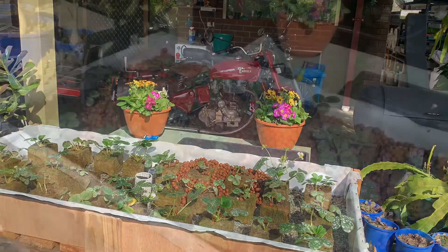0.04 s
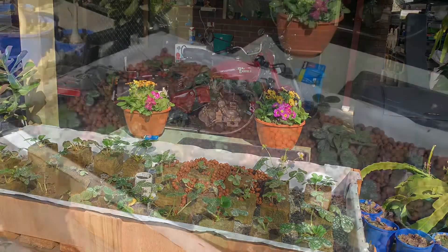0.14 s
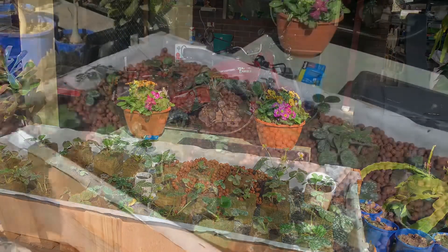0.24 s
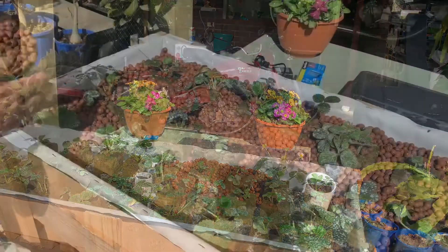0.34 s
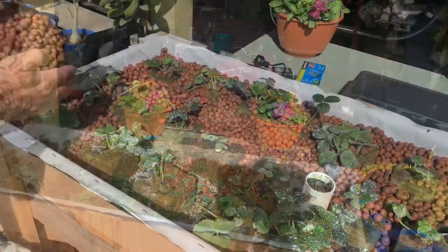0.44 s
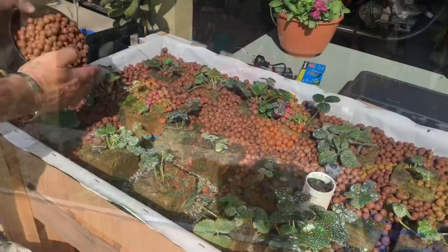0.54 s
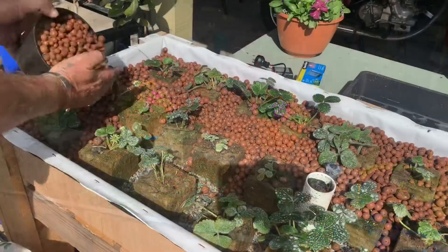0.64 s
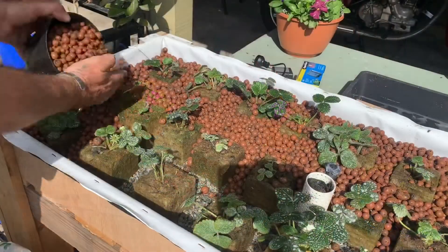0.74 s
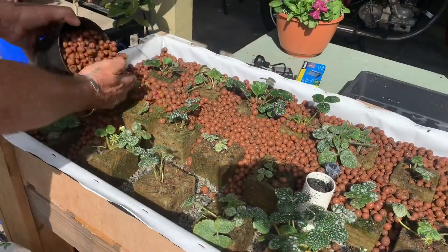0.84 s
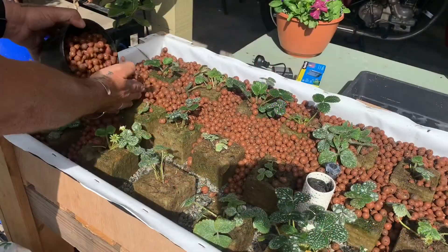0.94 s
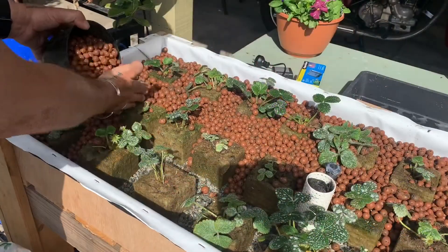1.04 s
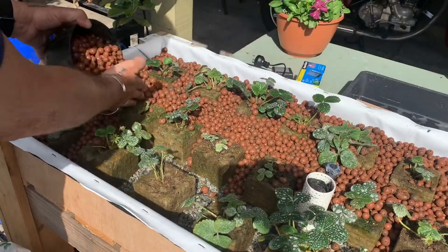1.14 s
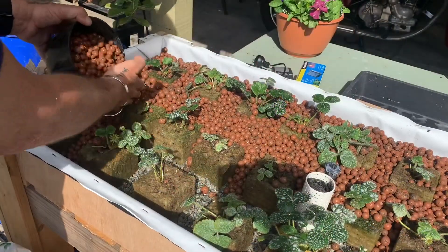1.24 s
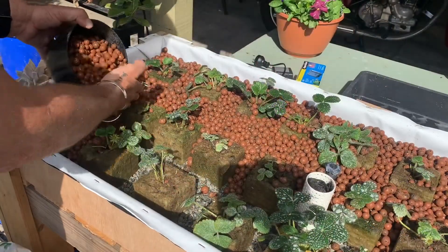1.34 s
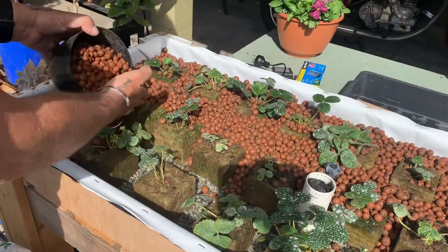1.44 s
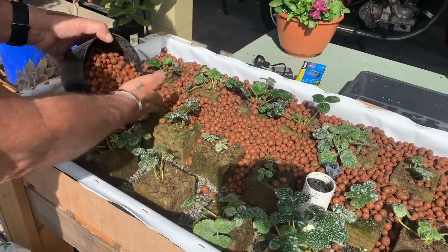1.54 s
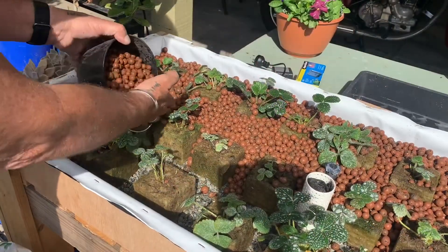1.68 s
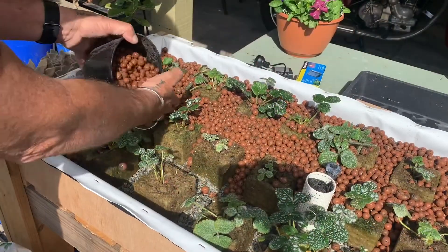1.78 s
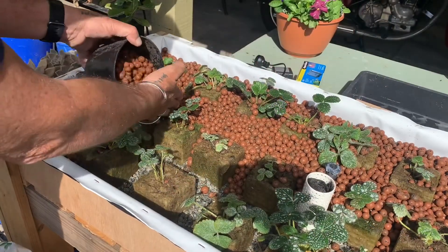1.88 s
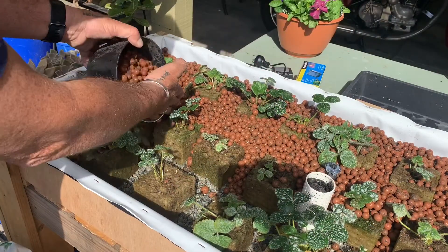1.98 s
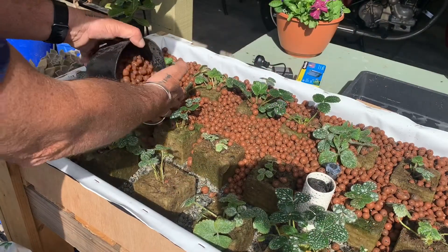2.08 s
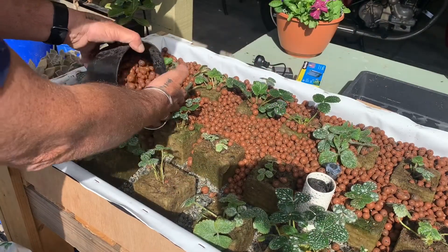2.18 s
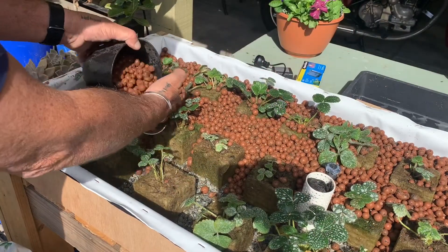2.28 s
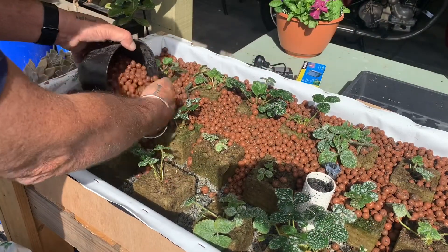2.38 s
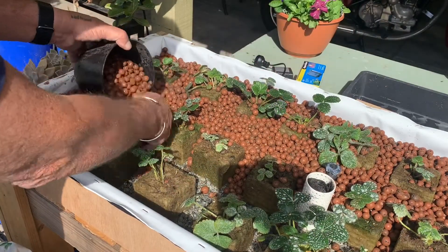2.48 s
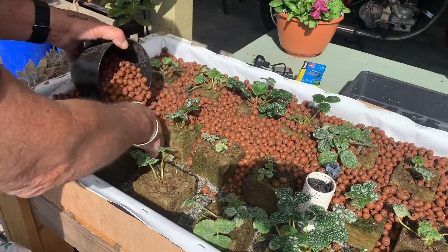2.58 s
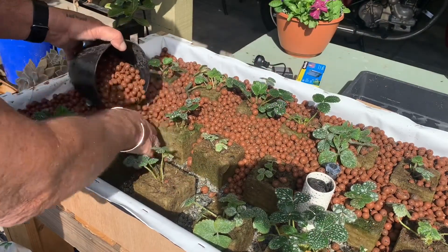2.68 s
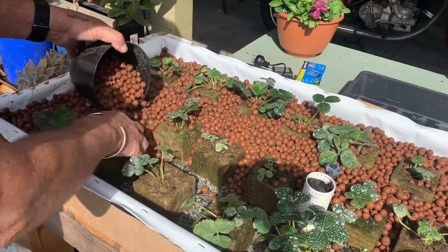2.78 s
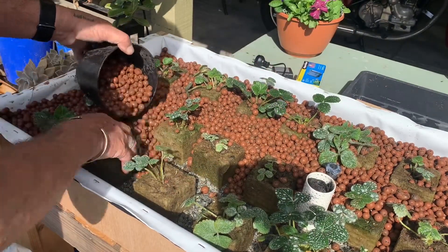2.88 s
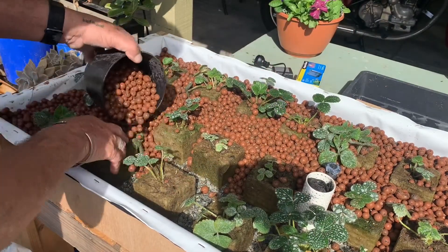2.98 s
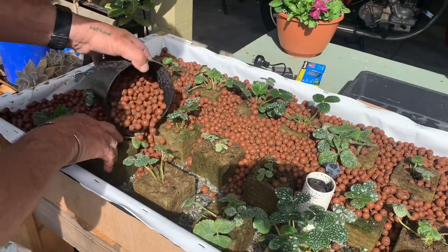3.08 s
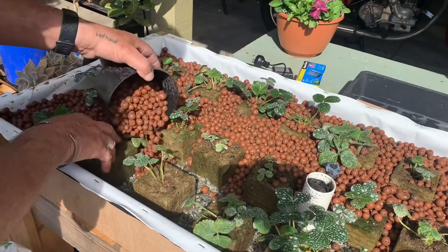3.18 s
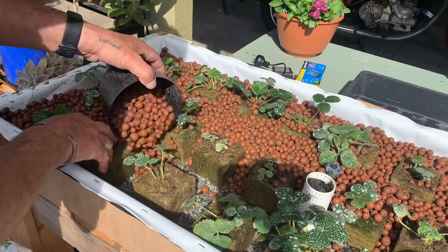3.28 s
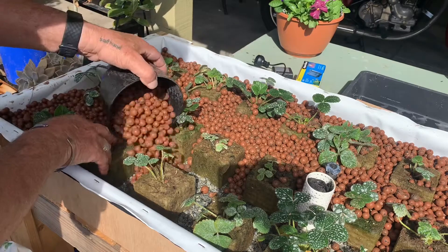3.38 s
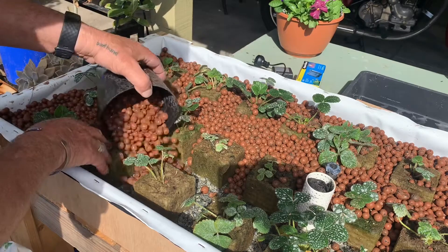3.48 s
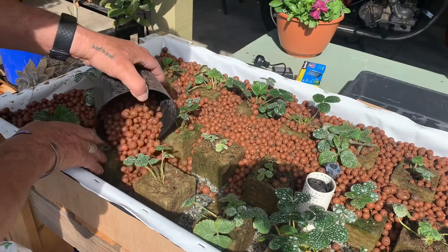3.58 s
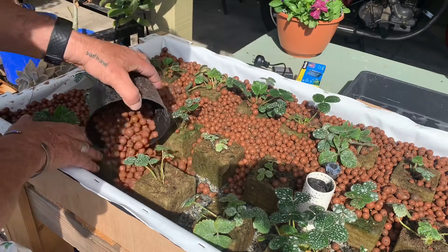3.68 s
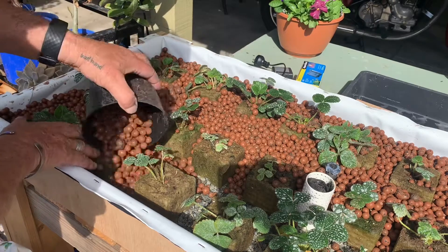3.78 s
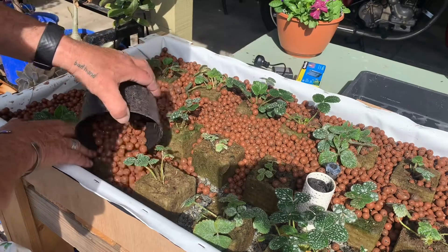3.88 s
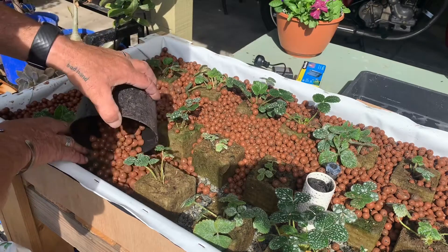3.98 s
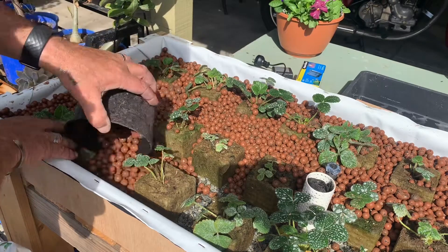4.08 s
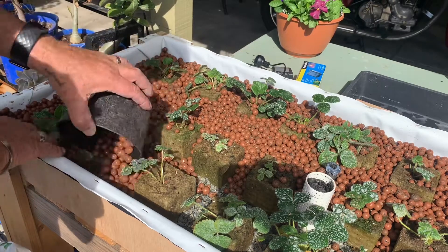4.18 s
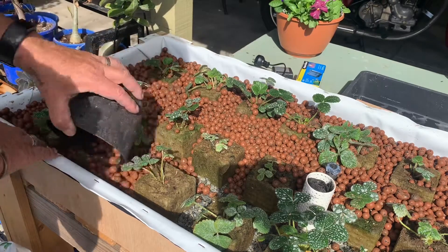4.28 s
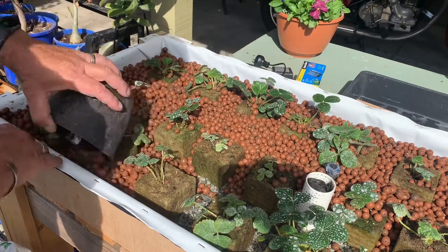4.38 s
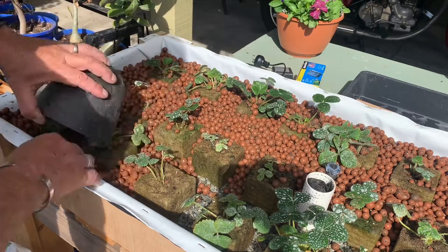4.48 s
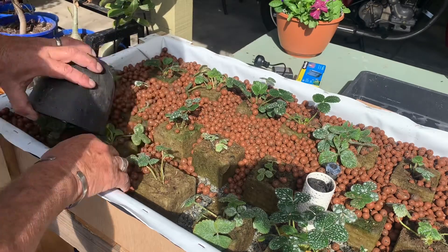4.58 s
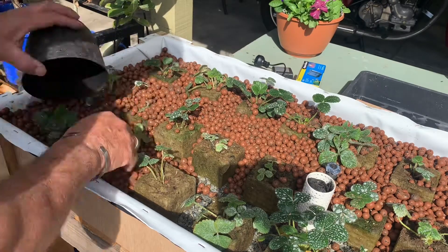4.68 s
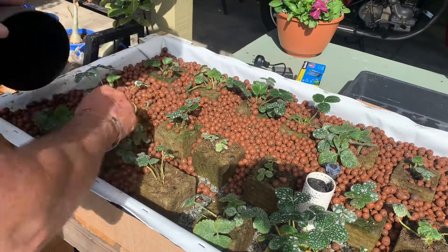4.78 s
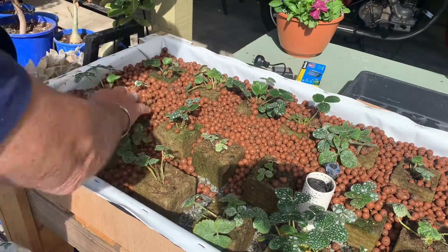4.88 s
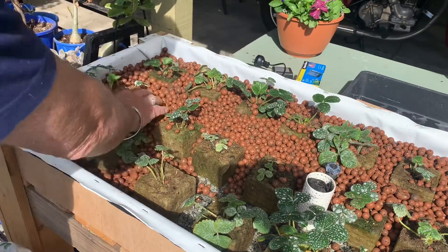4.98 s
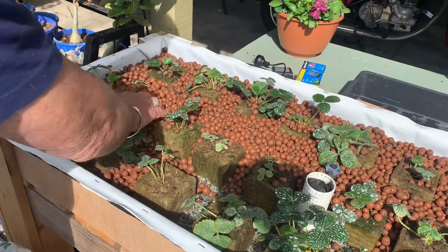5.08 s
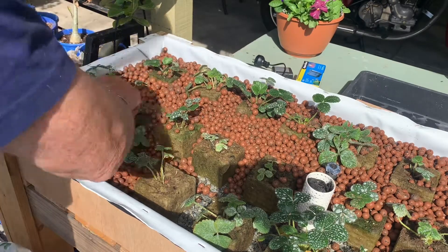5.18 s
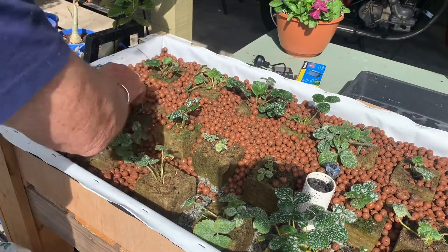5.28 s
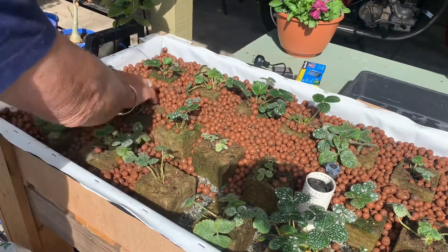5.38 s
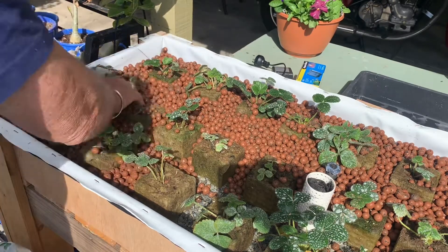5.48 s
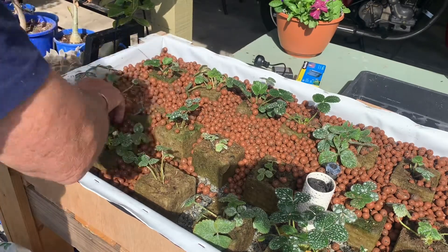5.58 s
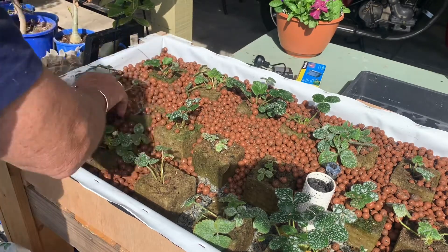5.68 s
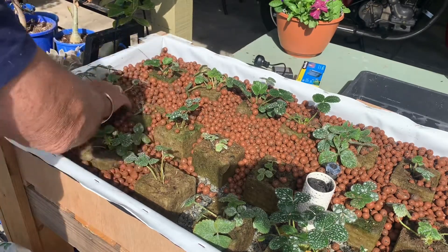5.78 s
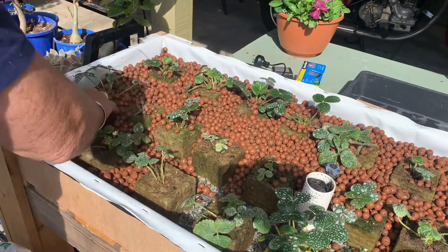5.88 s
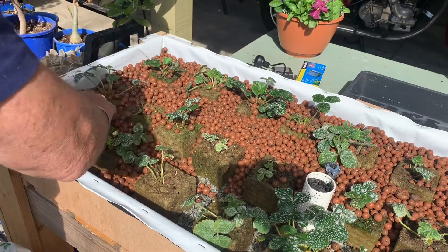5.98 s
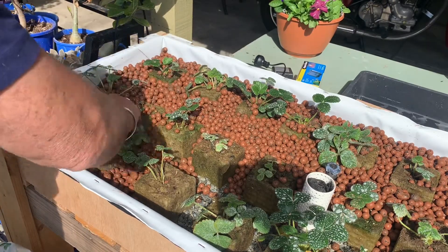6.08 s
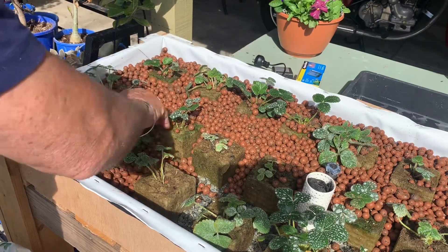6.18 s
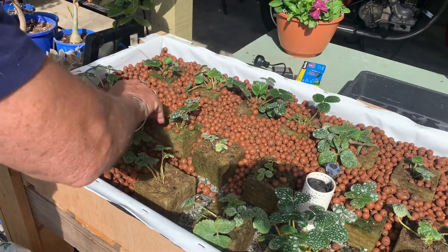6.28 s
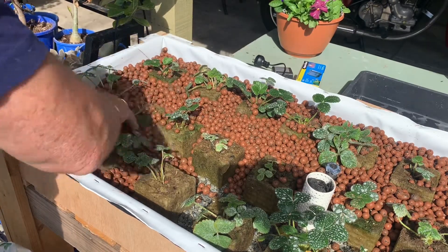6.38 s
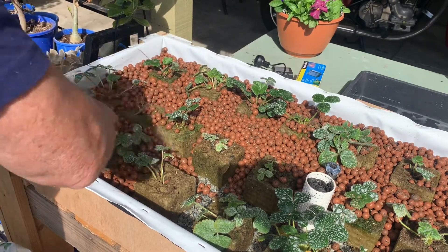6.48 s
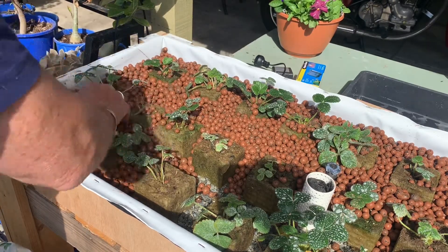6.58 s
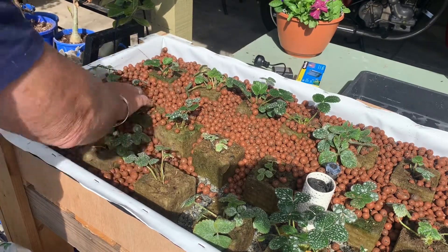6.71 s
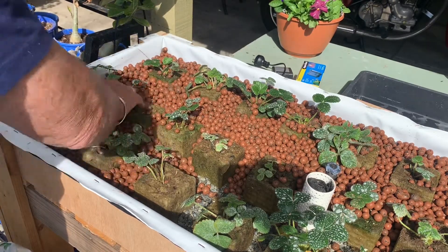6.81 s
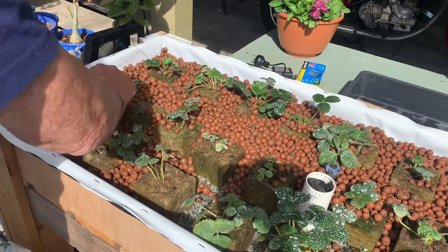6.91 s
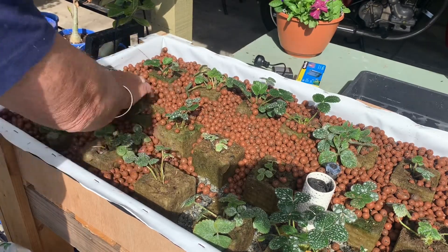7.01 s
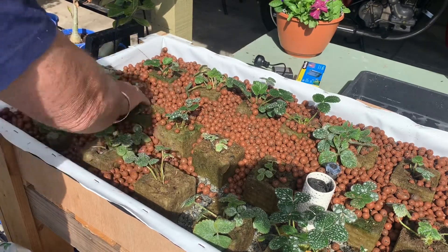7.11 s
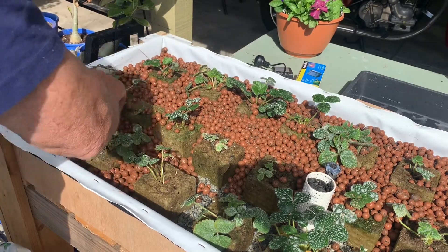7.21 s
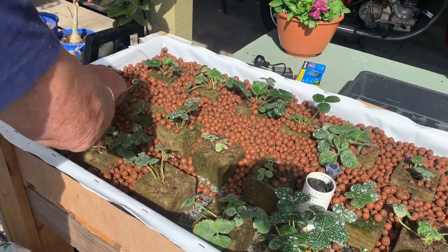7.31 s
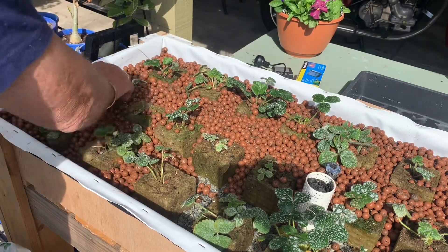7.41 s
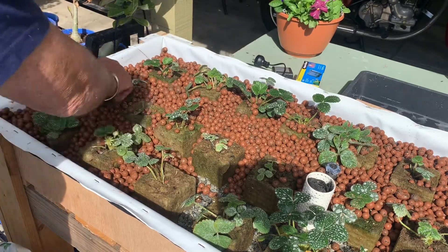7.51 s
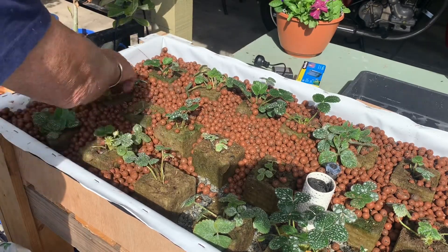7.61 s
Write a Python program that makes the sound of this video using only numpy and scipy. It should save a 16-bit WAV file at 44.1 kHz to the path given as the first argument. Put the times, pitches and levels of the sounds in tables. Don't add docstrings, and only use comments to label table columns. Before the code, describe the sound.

The first 0.4 seconds hold only low far rumble, soft air hiss and a couple of barely audible taps. At about 0.5 a faint thump marks the pot being lifted, and clay pebbles start to roll, rushing brightly at 0.75-0.9 with many short, dry, porous clacks and a hollow plastic resonance. The flow thins by 1.5, swells again around 2.0-2.4, then gets a small shake near 2.7. From 2.9 the pot tips further: a denser, lower-toned rush peaks around 3.4 and holds until about 3.7, then eases. Dull knocks of the pot cluster near 4.05, and the last pebbles drop out by 4.7. From 4.9 a hand rakes the bed in short clattering strokes, strongest around 5.0-5.5, with further bursts near 6.0 and 6.35. Sparse, softer clicks settle from 6.5 onward, with light dull bumps near 6.9 and 7.6. Close stereo, dry and open.

```python
import sys
import numpy as np
from scipy import signal
from scipy.fft import rfft, irfft, next_fast_len
from scipy.io import wavfile

SR = 44100
rng = np.random.default_rng(int(sys.argv[2]) if len(sys.argv) > 2 else 0)


def master_out(mix):
    frames = np.transpose(np.atleast_2d(mix))
    ceiling = np.clip(frames, -1, 1)
    pcm = np.round(ceiling * 32767).astype(np.int16)
    wavfile.write(sys.argv[1], SR, pcm)


def gain_from_decibels(decibels):
    exponent = np.asarray(decibels, float) / 20
    return 10 ** exponent


N = 337365

# start_s, clack_level_db
FIRST_POUR = [
    (0.36, -86),
    (0.58, -51.5),
    (0.79, -36.5),
    (1.04, -40.5),
    (1.45, -49.5),
    (2.06, -44),
    (2.13, -36.5),
    (2.6, -46.5),
    (2.86, -59.5),
]
SECOND_POUR = [
    (2.86, -49.5),
    (3.02, -46),
    (3.341, -32.5),
    (3.62, -35),
    (4.05, -39),
    (4.222, -42),
    (4.56, -57.5),
    (4.71, -67),
    (4.88, -102),
]
# peak_s, clack_level_db, rise_s per 20 dB, fall_s per 20 dB
STROKES = [(2.691, -39, 0.14, 0.2), (4.922, -53.5, 0.0035, 0.27), (5.071, -41.5, 0.13, 0.24),
           (5.3, -40.5, 0.021, 0.21), (5.452, -38, 0.12, 0.15), (5.82, -47.5, 0.65, 0.21),
           (6.01, -44, 0.85, 0.39), (6.354, -43, 0.012, 0.15), (6.75, -50, 0.12, 0.47),
           (7.12, -53, 0.2, 0.23), (7.56, -60.5, 0.71, 0.51)]
USUAL_DB = -45

# start_s, peak_db, dullness_db (share at 3-6
# kHz; above -14 counts as -14)
CLEAR_CLACKS = [(0.5548, -45, 2), (0.5598, -49, -9), (0.5718, -43, -15), (0.5887, -37, -6),
                (0.6325, -37, 0), (0.6332, -18.5, -11), (0.664, -30, -10), (0.6716, -32, -10),
                (0.686, -27, -18), (0.703, -16.5, -14), (0.7201, -17, -17), (0.729, -15.5, -19),
                (0.7484, -11, -18), (0.7758, -27, -17), (0.8, -14, -27), (0.8192, -24, -19),
                (0.836, -14, -33), (0.864, -12.5, -21), (0.8856, -20, -23), (0.912, -22, -26),
                (0.916, -27, -20), (0.9402, -17, -18), (0.9454, -19, -26), (0.9806, -21.5, -28),
                (0.9894, -21, -24), (1.036, -26, -14), (1.0846, -37, -15), (1.1041, -34, -10),
                (1.108, -25, -13), (1.114, -26, -11), (1.164, -23.5, -5), (0.742, -15, -24),
                (1.1914, -23, -21), (1.2143, -26, -13), (1.229, -21, -13), (1.249, -25, -22),
                (1.289, -23, -30), (1.316, -28, -12), (1.3321, -29, -20), (0.868, -17, -20),
                (1.359, -27, -28), (1.368, -22, -21), (1.3939, -26.5, -14), (1.405, -26, -15),
                (1.4278, -29, -23), (1.4338, -35, -19), (1.4563, -31, -9), (1.46, -33, -15),
                (1.4725, -26, -13), (1.485, -20.5, -25), (1.5032, -28, -23), (1.535, -40, -12),
                (1.5342, -19, -30), (1.5854, -38, -14),
                (1.5849, -44, -16), (1.6038, -38, -14), (1.6073, -33, -11), (1.629, -27, -13),
                  (1.6522, -36, -12), (1.6706, -21, -33), (1.7052, -25, -24), (1.737, -24, -22),
                  (2.706, -33, -14), (1.751, -23.5, -31), (1.7707, -17, -18), (1.803, -31, -13),
                  (1.818, -20.5, -17), (1.8632, -19.5, -22), (1.8927, -27, -27), (1.9165, -18.5, -39),
                  (1.9331, -41, -25), (1.974, -34, -2), (1.9736, -13, -11), (1.998, -19, -13),
                  (2.0264, -32, -11), (2.0402, -20.5, -22), (2.0596, -20, -22), (2.101, -19, -24),
                  (2.146, -20, -28), (2.1623, -24, -25), (2.191, -29, -26), (2.2464, -17, -27),
                  (2.2707, -19, -22), (2.2928, -19, -20), (2.3122, -19, -14), (2.3375, -17, -21),
                  (2.3436, -28, -20), (2.3476, -18.5, -32), (2.401, -19, -28), (2.431, -23, -19),
                  (2.4405, -20.5, -28), (2.5018, -25, -25), (2.514, -19.5, -28), (2.5587, -33, -21),
                  (2.5751, -31, -13), (2.597, -25, -13), (2.526, -22, -27), (2.6293, -19, -18),
                  (2.637, -19.5, -19), (2.662, -21.5, -4), (2.6883, -31, -13), (2.6948, -29, -13),
                  (2.738, -31, -3.5), (2.7642, -28, -11), (2.783, -29, -23),
                (2.819, -34, -22), (2.8424, -30, -14), (2.8597, -40, -13), (2.8596, -18, -30),
                 (2.8963, -32, -25), (2.8961, -25, -24), (2.942, -27, -22), (2.948, -28, -21),
                 (2.9864, -15, -33), (2.9962, -15.5, -26), (3.04, -21.5, -17), (3.0513, -26, -14),
                 (3.082, -19, -24), (3.1067, -22, -24), (3.1304, -33, -23), (3.1301, -16, -32),
                 (3.1625, -26, -27), (3.168, -18, -19), (3.185, -20, -12), (3.2034, -22, -12),
                 (3.222, -20, -26), (3.2278, -16, -31), (3.2773, -16, -15), (3.3242, -35, -19),
                 (3.3371, -30, -16), (3.36, -26, -17), (3.376, -15, -23), (3.392, -19.5, -36),
                 (3.4105, -10, -31), (3.4379, -23, -14), (3.4753, -26, -17), (3.5187, -17, -21),
                 (3.5446, -18, -25), (3.5642, -14, -26), (3.627, -19.5, -14), (3.649, -16, -15),
                 (3.6752, -14, -22), (3.6988, -22, -26), (3.7238, -35, -14), (3.7787, -16.5, -25),
                 (3.7985, -19, -13), (3.826, -26, -9), (3.8385, -31, -15), (3.8634, -30, -15),
                 (3.897, -29, -11), (3.9028, -26, -7), (3.9433, -27, -13), (3.949, -26, -20),
                 (3.9822, -37, -17), (3.9872, -35, -18), (4.0136, -28, -18), (4.0296, -33, -11),
                 (4.028, -21, -17), (4.045, -13, -29), (4.0703, -15, -31), (4.1137, -20, -26),
                 (4.1257, -26.5, -27), (4.1784, -34, -7),
                (4.2086, -34, -19), (4.222, -20.5, -27), (4.2616, -26, -22), (4.2578, -17, -40),
               (4.3186, -28, -30), (4.3223, -26, -24), (4.3437, -26, -24), (4.371, -24, -28),
               (4.3818, -20.5, -17), (4.4023, -29, -17), (4.4266, -25.5, -17), (4.4458, -30, -16),
               (4.476, -32, -13), (4.4947, -29, -19), (4.5196, -28, -11), (4.57, -43, -14),
               (4.577, -39, -14), (4.598, -52, -12), (4.6124, -36, -18), (4.632, -38, -18),
               (4.638, -30, -12), (4.665, -33, -7), (4.6776, -35.5, -14), (4.6987, -48, -16),
               (5.122, -27, -23), (4.7513, -37, -21), (4.7761, -30.5, -21), (4.8933, -43, -14),
               (5.153, -28, -26), (4.903, -26.5, -32), (4.9332, -33, -23), (4.9746, -33, -25),
               (4.9971, -36, -20), (5.006, -28, -20), (5.0157, -30, -20), (5.0385, -30, -13),
               (5.05, -27, -24), (5.0569, -21, -29), (5.0804, -22, -29), (5.0938, -28, -21),
               (5.1141, -21, -34), (5.1602, -26, -14), (5.159, -21.5, -22), (5.2155, -33, -15),
                (5.2159, -43, -14), (5.2348, -44, -20), (5.2503, -27, -18), (5.2913, -26.5, -18),
                (5.2914, -17, -22), (5.3351, -40, -21), (5.3351, -34, -22), (5.389, -34, -15),
                (5.389, -23, -25), (5.4009, -21, -25), (5.4123, -22, -30), (5.4379, -31, -21),
                (5.4588, -25, -17), (5.4618, -22, -14), (5.467, -33, -18), (5.5277, -28, -21),
                (5.535, -21, -22), (5.5496, -30, -13), (5.5496, -18.5, -27), (5.574, -28, -20),
                (5.603, -25, -20), (5.607, -40, -18), (5.6494, -34, -17), (5.6768, -45, -10),
                (5.677, -33, -13), (5.697, -24, -19), (5.7207, -37, -13), (5.7207, -34, -17),
                (5.7367, -20, -16), (5.7596, -29, -10), (5.7701, -35, -14), (5.7945, -44, -11),
                (5.8365, -42, -14), (5.8429, -38, -12), (5.8539, -35, -18), (5.8604, -36, -16),
                (5.8674, -29, -20), (5.8883, -33, -23), (5.9068, -39, -20), (5.9267, -45, -20),
                (5.9477, -28, -18), (5.976, -35, -17), (5.9927, -30, -18), (5.9954, -19.5, -16),
                (6.053, -39, -25), (6.0719, -34, -18), (6.0859, -36, -11), (6.1073, -25, -12),
                (6.1178, -24, -23), (6.1453, -40, -13), (6.1588, -20, -14), (6.17, -22, -13),
                (6.2181, -27, -12), (6.2365, -30.5, -11), (6.2625, -43, -15), (6.286, -31, -17),
                (6.2869, -35, -19), (6.2912, -31, -20), (6.309, -43, -19), (6.3447, -42, -6),
                   (6.345, -25, -6), (6.363, -28, -5), (6.379, -40, -13), (6.4769, -39.5, -29),
                   (6.5074, -43, -15), (6.5228, -37.5, -22), (6.5523, -36, -23), (6.5737, -59, -14),
                   (6.5917, -53, -7), (6.6565, -53, -22), (6.671, -38, -25), (6.6815, -43, -14),
                   (6.712, -35, -14), (6.74, -38, -14), (6.759, -26, -13), (6.7598, -21.5, -29),
                   (6.8195, -26.5, -19), (6.8431, -41, -15), (6.915, -32, -27), (6.8712, -29, -23),
                   (6.9179, -30.5, -20), (6.932, -44, -15), (6.972, -24, -18), (6.9962, -40, -19),
                   (7.0397, -34, -14), (7.0696, -39, -24), (7.081, -30, -19), (7.092, -27, -12),
                   (7.104, -32, -19), (7.114, -45, -14), (7.136, -48, -23), (7.151, -40, -18),
                   (7.181, -35, -21), (7.127, -27, -14), (7.1591, -30.5, -13), (7.1675, -26, -13),
                   (7.2252, -49, -16), (7.2397, -47, -12), (7.2805, -40, -18), (7.3035, -55, -11),
                   (7.3145, -47, -11), (7.318, -47, -24), (7.3522, -38.5, -14), (7.3699, -42, -22),
                   (7.4073, -46, -13), (7.4338, -36, -17), (7.4826, -56, -11), (7.505, -41, -17),
                   (7.5141, -38, -18), (7.5605, -58, -15), (7.5929, -44.5, -21), (7.6095, -33.5, -24)]
# pitch_hz, level_db
PEBBLE = [(1200, -16), (2500, -13), (4000, -10.5), (5700, -9.5), (7200, -2), (9000, -2), (11000, -3),
          (13000, -11), (14600, -18.5), (15600, -16.5)]
PEBBLE_MODES_HZ = np.geomspace(1200, 15600, 24)

# (from_s, to_s), then rows of pitch_hz, width_hz, level_db
POT_FULL = (0.39, 2.965), [(355, 300, -7.5), (693, 77, 1.5), (898, 150, -7), (1588, 79, 2.5),
            (2273, 340, -1.5), (3190, 530, -1.5)]
POT_TIPPED = (2.915, 4.337), [(283, 370, -4.5), (560, 84, 3.5), (714, 265, -4.5), (1270, 144, -2.5),
              (1850, 110, -1), (2467, 360, 6), (2590, 1290, 0.5)]
BED = (4.37, 7.53), [(347, 213, -6.5), (663, 68, -1), (890, 215, -8)]

# start_s, peak_db, pitch_hz, t60_s (time to fade by 60 dB)
KNOCKS = [(0.143, -52, 835, 0.07), (0.754, -32.5, 386, 0.04), (0.865, -42, 996, 0.11),
          (1.034, -41, 700, 0.062), (3.319, -37, 267, 0.18), (4.036, -27, 520, 0.12),
          (4.037, -27.5, 864, 0.047), (7.623, -48, 1050, 0.039), (4.058, -26.5, 490, 0.053),
          (4.073, -29, 347, 0.088), (4.093, -38, 272, 0.38), (5.289, -47, 155, 0.19),
          (5.292, -41.5, 824, 0.1), (6.0, -42, 715, 0.048), (6.347, -51, 616, 0.083),
          (6.899, -39, 200, 0.1), (7.624, -67, 121, 0.055), (7.6425, -45, 584, 0.06),
          (7.646, -38, 573, 0.06)]
# start_s, peak_db, pitch_hz, t60_s
TAPS = [
    (0.0094, -48.5, 2130, 0.013),
    (0.1465, -48, 3340, 0.078),
]
# start_s, peak_db, pitch_hz, t60_s
THUMPS = [
    (0.519, -39, 140, 0.1),
    (0.556, -40, 75, 0.16),
]

# pitch_hz, level_db per Hz
AIR = [(15, -35), (30, -18), (55, 3.5), (100, 1.5), (150, -2), (270, -12.5), (300, -3.5), (335, -13),
       (1000, -20.5), (2500, -17.5), (6000, -30), (9500, -27), (12500, -40), (15600, -33)]
# centre_s, change_db, width_s
SWELLS = [
    (0.25, 1.5, 0.2),
    (0.56, -12, 0.049),
    (1.152, -4.5, 0.18),
    (4.2, 5.5, 0.46),
    (7.5, 3, 0.098),
]
# start_s, level_db
HISS = [(0, -61), (.33, -60), (.55, -55), (.9, -56.5), (4.5, -58), (7.65, -62)]

# pitch_hz, lead (left first +1, last -1), diffuse_db, left_over_right_db
PORTS = [(200, .3, -16.5, -1.3), (300, .8, -2.5, -3.5), (700, .7, -5, 2.2), (2400, .75, -8, .1),
         (3400, .7, -5, 1), (4700, .6, -3, -2.5), (6300, .5, -2.5, -3), (7150, -.75, -11, 0),
         (9300, -.75, -22, 0), (12500, -.72, -18, 0), (12900, -.1, -22, 0), (16000, -.1, -24, 0)]
PORT_LAG_S = 1 / 4630
# pitch_hz, plain_hz (pitch whose plain lag it shows)
BENT = [(0, 0), (1900, 1900), (2600, 2315), (3400, 2950), (4500, 4300), (6000, 6000), (23000, 23000)]
# from_hz, to_hz, change_db
WEAK_SUM = [(11150, 12350, -7), (15000, 15600, -5)]
WEAK_DIFFERENCE = [(2000, 2800, -1.5), (6200, 7700, -3.5), (8950, 9750, -6), (11000, 12700, -2.5),
                   (13200, 15200, -7)]
# start_s, diffuse_path_db
SCATTERED = [(2.95, -.8), (3.15, 3), (4.4, 3), (4.9, -1.8)]


def rms_one(x):
    return x / np.sqrt(np.mean(x ** 2) + 1e-20)


def in_time(rows):
    seconds, level = np.transpose(rows)
    return np.interp(np.arange(N) / SR, seconds, level)


def at_hz(points, hz, column=1):
    points = np.array(points)
    return np.interp(np.log(hz), np.log(points[:, 0]), points[:, column])


def drift(rate_hz):
    r = np.exp(-80 * np.pi * rate_hz / SR)
    slow = signal.lfilter([1], [1, -2 * r, r * r], rng.standard_normal(N // 40 + 2002))[2000:]
    return np.interp(np.arange(N) / 40, np.arange(len(slow)), rms_one(slow))


def ring(clicks, hz, width_hz):
    r = np.exp(-np.pi * width_hz / SR)
    turn = 2 * np.pi * hz / SR
    top = [(1 - r * r) / 2, 0, (r * r - 1) / 2]
    return signal.lfilter(top, [1, -2 * r * np.cos(turn), r * r], clicks + 1e-18)


def flow():
    t = np.arange(N) / SR
    power = gain_from_decibels(2 * -97.0)
    for pour in (FIRST_POUR, SECOND_POUR):
        outside_s = np.maximum(pour[0][0] - t, 0) + np.maximum(t - pour[-1][0], 0)
        power = power + gain_from_decibels(2 * (in_time(pour) - 340 * outside_s))
    for s, db, rise, fall in STROKES:
        away = np.maximum((s - t) / max(rise, .01), (t - s) / max(fall, .01))
        power = power + gain_from_decibels(2 * (db - 20 * away))
    return 10 * np.log10(power)


def contacts(level_db, density_db, per_s, spread_db, clump_db):
    rate = per_s * gain_from_decibels(.5 * (level_db + 41.0) + density_db + clump_db * drift(25))
    mean_rate = per_s * gain_from_decibels(.5 * (level_db + 39.5) + density_db)
    sizes = rms_one(gain_from_decibels(spread_db * np.minimum(rng.exponential(1, N), 4.5)))
    return (rng.random(N) < rate / SR) * sizes * gain_from_decibels(level_db) * np.sqrt(SR / mean_rate)


def scatter(blows, near_db, near_t60, tail_db, tail_t60):
    power = blows ** 2
    for db, t60 in ((near_db, near_t60), (tail_db, tail_t60)):
        fading = signal.lfilter([0, 1], [1, -gain_from_decibels(-120 / (t60 * SR))], blows ** 2)
        power = power + gain_from_decibels(2 * db) * fading
    return np.sqrt(power)


def clack(bright, dull, cycles, vary_db):
    luck = rng.choice([-1., 1.], (3, N + 64)) * gain_from_decibels(vary_db * rng.standard_normal(N + 64))
    out = np.zeros((3, N))
    for k, hz in enumerate(PEBBLE_MODES_HZ):
        blows = (dull if hz < 6000 else bright) * luck[:, 2 * k:2 * k + N]
        out += gain_from_decibels(at_hz(PEBBLE, hz)) * ring(blows, hz, hz / cycles)
    return out


def pebbles(level_db, density_db):
    stream = gain_from_decibels(8.5) * contacts(level_db, density_db, per_s=2600, spread_db=2.0, clump_db=4.0)
    glancing = gain_from_decibels(9) * contacts(level_db, density_db, per_s=1400, spread_db=-1.0, clump_db=5.0)
    stray_db = USUAL_DB + 0.98 * (level_db - USUAL_DB)
    strays = gain_from_decibels(-15) * contacts(stray_db, 0 * level_db, per_s=67, spread_db=-3.0, clump_db=21.0)
    bright = stream + strays
    dull = np.hypot(0.82 * stream, glancing) + 0.21 * strays
    blows = np.array([bright, dull])
    bright, dull = scatter(blows, near_db=-6, near_t60=.0045, tail_db=-21.5, tail_t60=.04)
    return clack(bright, dull, cycles=12.5, vary_db=4.0)


def collisions():
    events = (CLEAR_CLACKS)
    s, peak_db, dull_db = np.transpose(events)
    size, hz = 2048, PEBBLE_MODES_HZ
    t, f = np.arange(size) / SR, np.fft.rfftfreq(size, 1 / SR)
    rise_s, crack_t60_s, wash_db, wash_t60_s = 0.0004, 0.0038, -25, 0.05
    fade = np.hypot(gain_from_decibels(-60 * t / crack_t60_s), gain_from_decibels(wash_db - 60 * t / wash_t60_s))
    shape = (1 - np.exp(-(t / rise_s) ** 2)) * fade
    draws = rng.standard_normal((len(s), 3, size + 24))
    click = 1. * (t == 0)
    modes = rfft([ring(click, h, h / 10.0) for h in hz])
    lowness = np.clip(np.log2(7000 / hz) / .5, 0, 1)
    db = at_hz(PEBBLE, hz) + lowness * (np.minimum(dull_db, -14)[:, None] + 12.0)
    db = db + 2.2 * draws[:, 0, size:]
    colour = (gain_from_decibels(db) * (-1.) ** np.arange(24)) @ modes
    heard = rfft(draws[..., :size] * shape) * colour[:, None]
    band = ((f > 7500) & (f < 11000)) * np.cos(np.pi * f * PORT_LAG_S)
    top = np.abs(irfft(heard * band, size)).max(axis=2, keepdims=True)
    hits = irfft(heard, size) / top * gain_from_decibels(peak_db - 2.06)[:, None, None]
    out = np.zeros((3, N + size))
    for hit, start in zip(hits, ((s + 0.0003) * SR).astype(int)):
        out[:, start:start + size] += hit
    return out[:, :N]


def hollow(level_db, density_db):
    blows = contacts(level_db, density_db, per_s=800, spread_db=-0.3, clump_db=3.5)
    blows = blows * rng.standard_normal((3, N))
    out, t = np.zeros((3, N)), np.arange(N) / SR
    for (start, end), modes in (POT_FULL, POT_TIPPED, BED):
        fade_in = np.clip((t - start) / 0.29 + .5, 0, 1)
        fade_out = np.clip((end - t) / 0.25 + .5, 0, 1)
        inside = fade_in * fade_out * blows
        for k, (hz, width, db) in enumerate(modes):
            out += (-1) ** k * gain_from_decibels(db + 2.1 * drift(8.4)) * ring(inside, hz, width)
    return gain_from_decibels(18.0) * out


def knocks():
    out = np.zeros((3, N))
    grit = rng.standard_normal((3, int(.15 * SR)))
    path_gain = np.array([[.8], [.3], [.25]])
    for s, peak_db, hz, t60 in [*KNOCKS, *TAPS, *THUMPS]:
        start = int(s * SR)
        t = np.arange(min(grit.shape[1], N - start)) / SR
        turn = 2 * np.pi * hz * t
        modes = np.sin(turn) + 0.081 * np.sin(2.0 * turn) + 0.42 * np.sin(0.51 * turn)
        grit = np.roll(grit, 997, axis=1)
        crunch = rms_one(ring(ring(grit, hz, 2.0 * hz), hz, 1.9 * hz))[:, :len(t)]
        shape = gain_from_decibels(peak_db - 60 * t / t60) * (1 - np.exp(-t * hz / 0.15))
        slower = gain_from_decibels(20 * t / t60)
        out[:, start:start + len(t)] += shape * (modes * path_gain + 0.47 * crunch * slower)
    return out


def background():
    hz, t = np.maximum(np.fft.rfftfreq(N, 1 / SR), 10), np.arange(N) / SR
    colour = gain_from_decibels(at_hz(AIR, hz))
    unit = np.sqrt(np.sum(colour[(hz > 45) & (hz < 120)] ** 2) / len(hz))
    noise = rfft(rng.standard_normal((3, N))) * colour / unit
    low = 1 / (1 + (hz / 200) ** 4)
    rumble_db = -59 + 1.6 * drift(12)
    for s, db, width in SWELLS:
        rumble_db = rumble_db + db * np.exp(-((t - s) / width) ** 2)
    rumble = irfft(noise * low, N) * gain_from_decibels(rumble_db)
    hiss = irfft(noise * (1 - low), N) * gain_from_decibels(in_time(HISS))
    return rumble + hiss


def turned_down(hz, bands):
    total_db = 0
    for low, high, db in bands:
        total_db = total_db + db * np.clip(np.minimum(hz - low, high - hz) / 150 + .5, 0, 1)
    return gain_from_decibels(total_db)


def ports(paths):
    size = next_fast_len(N)
    hz = np.maximum(np.fft.rfftfreq(size, 1 / SR), 10)
    direct, other, diffuse = rfft(paths, size)
    lead = np.clip(at_hz(PORTS, hz), -1, 1)
    loose = gain_from_decibels(at_hz(PORTS, hz, column=2))
    half = np.pi * np.interp(hz, *np.transpose(BENT)) * PORT_LAG_S
    mid = np.cos(half) * direct + loose * np.sin(half) * diffuse
    sideways = lead * direct + np.sqrt(1 - lead ** 2) * other
    side = 1j * np.sin(half) * sideways + loose * np.cos(half) * diffuse
    mid = mid * turned_down(hz, WEAK_SUM)
    side = side * turned_down(hz, WEAK_DIFFERENCE)
    tilt = gain_from_decibels(at_hz(PORTS, hz, column=3) / 2)
    return irfft([(mid + side) * tilt, (mid - side) / tilt], size)[:, :N]


def scene():
    clack_db = flow()
    swing_db = clack_db - USUAL_DB
    density_db = -1 + 0.1 * swing_db
    hollow_db = -51.5 + 0.57 * swing_db
    paths = pebbles(clack_db, density_db) + collisions() + hollow(hollow_db, density_db + 7.5)
    direct, other, diffuse = paths
    paths = np.array([direct, other, diffuse * gain_from_decibels(in_time(SCATTERED))])
    return ports(paths + knocks() + background() * [[1], [1], [1.5]])


def band_limit(x):
    return signal.sosfilt(signal.butter(12, 16460, fs=SR, output="sos"), x)


def record(dry):
    cutoff_hz = 15750
    steep = signal.cheby2(10, 30, cutoff_hz * 1.02, fs=SR, output="sos")
    mix = signal.sosfilt(steep, dry)
    return band_limit(mix)


dry = scene()
out = record(dry)
master_out(out)
```